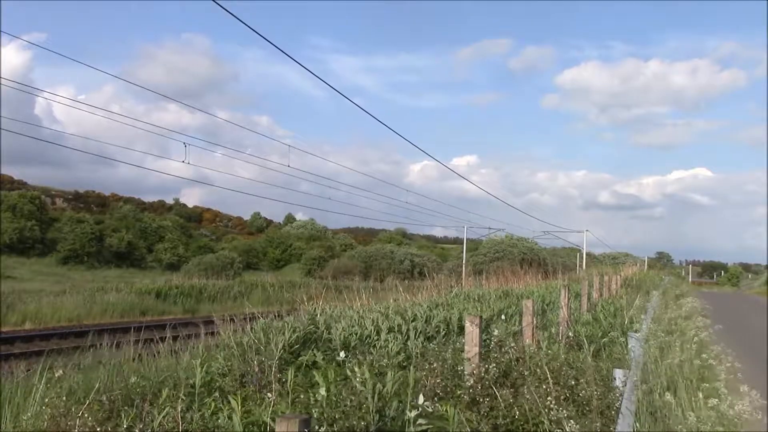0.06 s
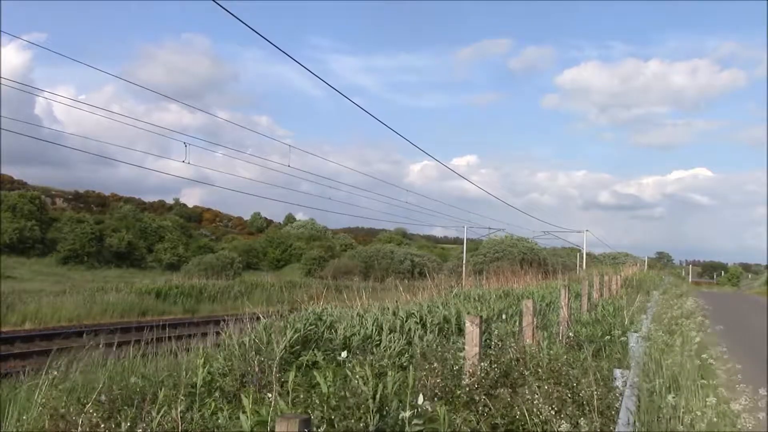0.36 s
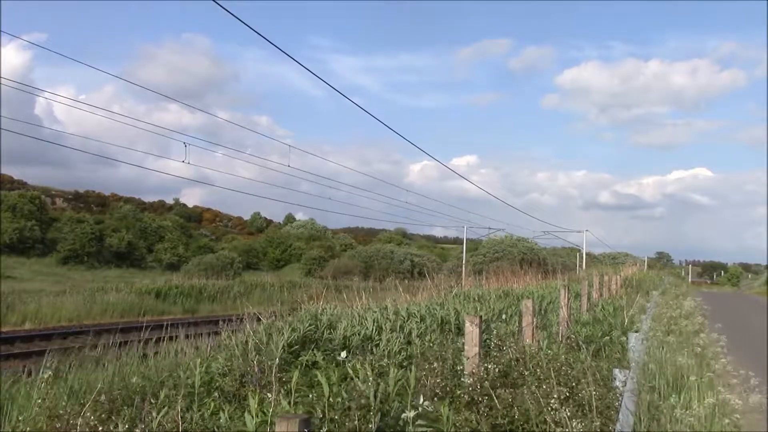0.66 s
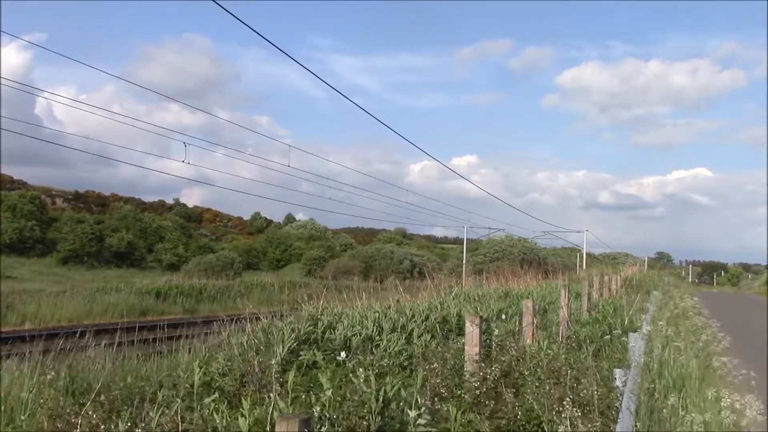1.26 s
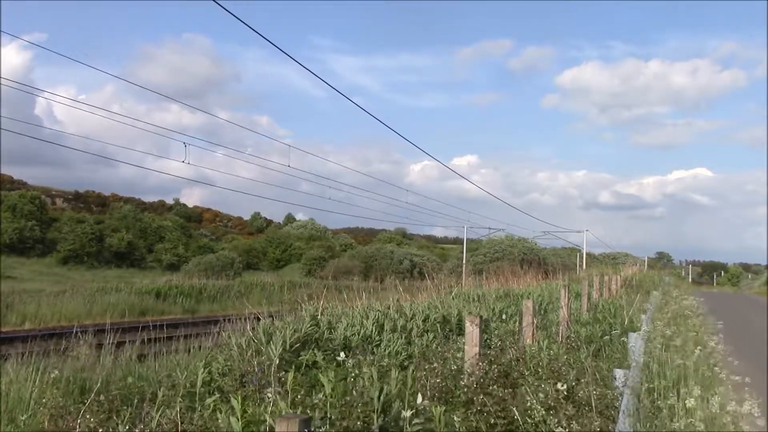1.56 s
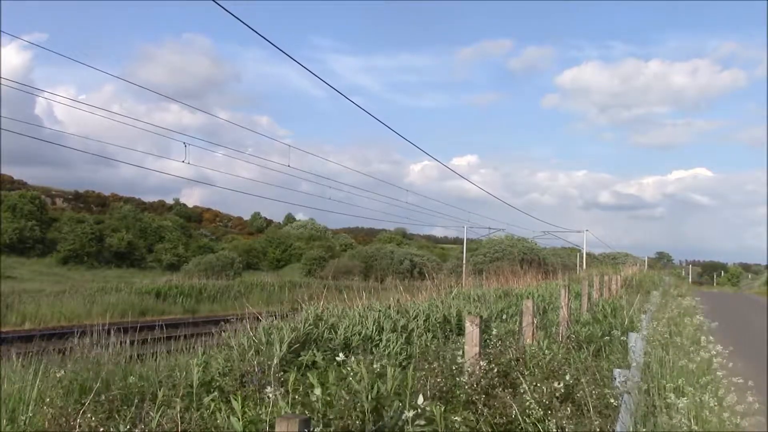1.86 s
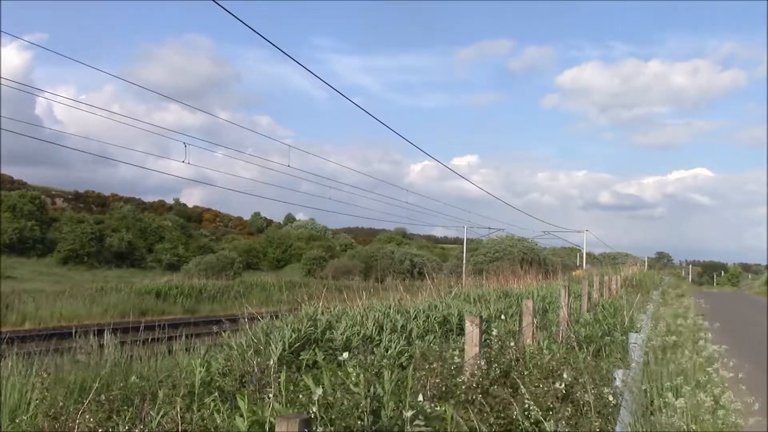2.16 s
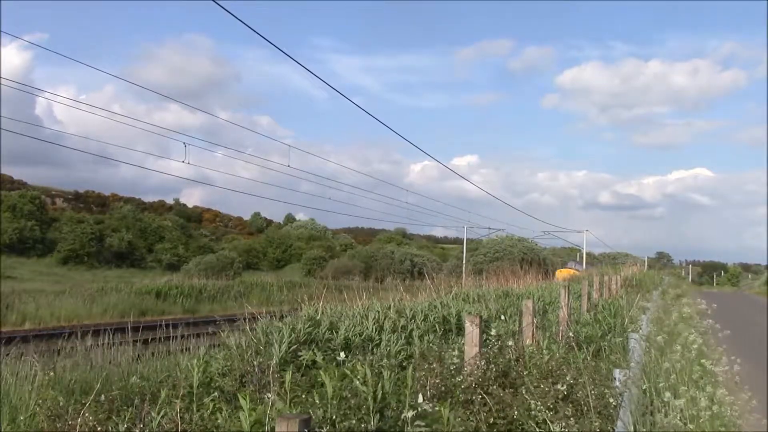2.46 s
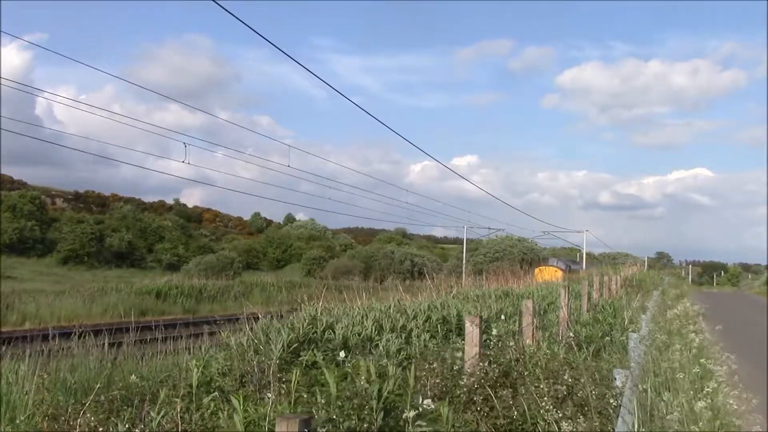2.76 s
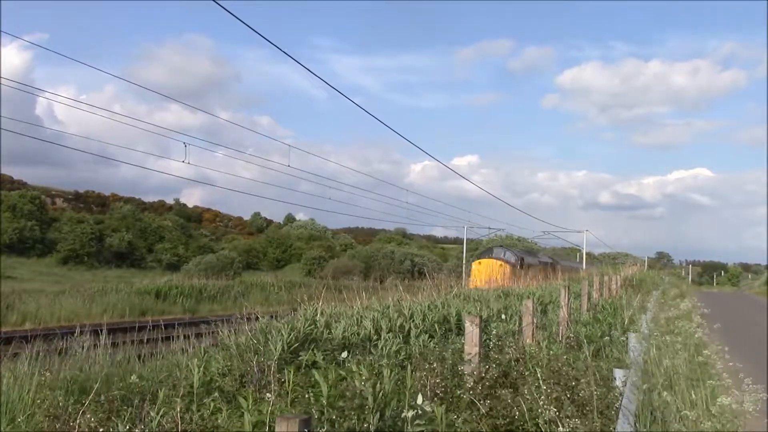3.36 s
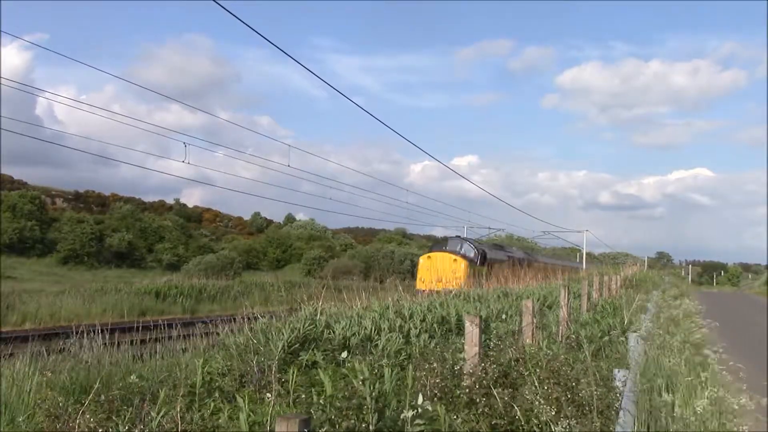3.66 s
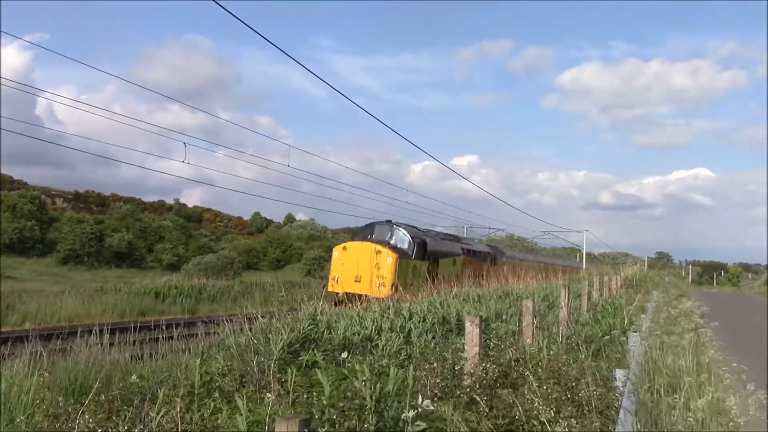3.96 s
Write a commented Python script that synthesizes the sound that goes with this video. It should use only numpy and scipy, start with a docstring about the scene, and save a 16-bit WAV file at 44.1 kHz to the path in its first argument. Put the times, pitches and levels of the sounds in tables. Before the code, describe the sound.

Rails chatter and hiss ahead of an oncoming diesel train, with gusts thumping the microphone.

```python
"""First you hear the rails sing: a chattering mid-range rush with a high steel hiss above it.
A diesel train is coming fast along open track, heard from the grass beside the line. Its rough wheels
shake the rails, which carry the sound ahead of it. The roar of the wheels and a low engine drone
grow as it nears, while gusts of wind thump and buffet the microphone."""
import sys
import numpy as np
from scipy import signal
from scipy.fft import rfft, irfft
from scipy.io import wavfile
from scipy.ndimage import uniform_filter1d, map_coordinates

SR = 44100
rng = np.random.default_rng(int(sys.argv[2]) if len(sys.argv) > 2 else 0)


def waveform_to_disk(signal):
    """Save audio, clipped to [-1, 1], as 16-bit WAV at the path in sys.argv[1]."""
    frames = np.transpose(np.atleast_2d(signal))
    scaled = np.clip(frames, -1, 1) * 32767
    samples = np.round(scaled).astype(np.int16)
    wavfile.write(sys.argv[1], SR, samples)


N = 176400
T = np.arange(N) / SR
HZ = np.maximum(np.arange(N // 2 + 1) * SR / N, 1)
TURN_HZ, TURN_HZ_PER_S = 10.277, .039  # how fast the wheels turn, and how fast that rises
TURNS = TURN_HZ * T + TURN_HZ_PER_S * T ** 2 / 2

# Rough spots on the wheels. Each row: place in the turn (0-1), strength in dB, half-length in seconds.
ROUGH_SPOTS = [(.03, 2, .002), (.15, 1, .0028), (.305, -1, .001), (.45, -3.5, .002), (.505, -3.5, .001),
               (.703, 3.5, .0017), (.875, -2, .0012)]
# Harder wheel knocks. Each row: time in seconds, dB above the rolling force.
WHEEL_KNOCKS = [(1.038, 28), (1.178, 26), (1.328, 24), (1.941, 26), (2.147, 28), (2.777, 25)]

# Pitches that ring easily. Each row: frequency in Hz, width in Hz, boost in dB.
TRACK_RESONANCES = [(409, 6, 5.5), (460, 13, 4), (483, 8, 2.5), (588, 10, 6), (631, 12, 5), (670, 14, 2.5),
                    (735, 14, 2), (770, 12, 2), (808, 10, 7.5), (886, 16, 4), (1083, 22, 3.5),
                    (1163, 20, 3.5), (1200, 16, 3), (1250, 22, 4.5), (1310, 22, 3), (1625, 50, 4.5),
                    (1800, 25, 2.5), (1861, 30, 4), (2031, 35, 3)]
HEAD_RESONANCES = [(4750, 220, 3), (5280, 100, 3), (5630, 170, 3.5), (6110, 110, 6), (6410, 90, 2.5),
                   (6880, 130, 2), (7270, 90, 2), (7482, 60, 3), (8300, 120, 2), (8830, 110, 3.5),
                   (9679, 120, 2), (9960, 90, 2), (10293, 130, 3), (10620, 110, 2), (10955, 110, 3),
                   (11230, 90, 2.5), (12350, 130, 2), (12920, 180, 2.5)]  # the head is the top of the rail

# The tone of each sound. Each row: frequency in Hz, relative level in dB.
BODY_TONE = [(290, -45), (350, -22), (400, -9.5), (482, -5.5), (500, -25), (516, -25), (530, -11),
             (565, -4.5), (612, -5), (700, -.5), (825, -.5), (850, -6), (880, -1.5), (950, -2),
             (1080, -15.5), (1300, -44)]  # the rail's lower bands, split by the spacing of the sleepers under it
RING_TONE = [(750, -42.5), (950, -11), (1060, -2), (1180, -.5), (1265, -2), (1330, -8), (1380, -13),
             (1425, -35), (1800, -52)]  # the rail ringing between its sleepers
HISS_TONE = [(1400, -42), (2100, -22), (2650, -15), (3300, -20), (4500, -30.5), (5200, -35), (5850, -26),
             (6150, -14), (6450, -17), (6850, -3), (7480, 1), (7750, -19), (8600, -35)]  # high waves in the rail head
SIZZLE_TONE = [(5500, -32), (7700, -13), (8400, -7.5), (9100, -5.5), (9900, -.5), (10600, 0), (11100, -1.5),
               (11700, -3.5), (13000, -5), (13700, -11.5), (15000, -15), (16000, -24)]  # the highest waves in the rail
NEAR_TONE = [(1500, -17), (2500, -18), (3500, -18.5), (5100, -16.5), (6100, -5.5), (6800, -1), (8200, -4),
             (9000, -5.5), (10200, -6), (11500, -13), (16000, -25)]  # broad hiss of wheels close by
ROAR_TONE = [(200, -20), (330, -8), (800, -3), (1330, -2.5), (1450, -8), (1600, 1), (2080, -1), (2800, -10),
             (4200, -15), (5100, -18), (6500, -21), (15000, -40)]  # wheel noise through the air
DRONE_NOTES = [(73, -19), (97, -2), (150, 2), (172, -6), (300, -5)]  # the separate notes of the engine
RUMBLE_TONE = [(20, -40), (45, -27), (70, -11), (100, -1), (150, 1), (240, -6), (350, -7), (700, -22)]  # the rumble under them
WIND_TONE = [(20, -30), (55, -21), (95, -6), (150, -2), (230, -1), (310, 3), (450, -1), (800, -17),
             (2000, -42)]  # wind on the microphone

# How the sounds swell and fade. Each row: time in seconds, relative level in dB.
BODY_SWELL = [(0, -37.5), (.2, -36.5), (.38, -32.5), (.62, -27.5), (.85, -30.5), (1.14, -26.5), (1.35, -28),
              (1.7, -26), (2.3, -22.5), (2.75, -20.5), (2.87, -19.5), (2.915, -15), (2.96, -19),
              (3.13, -19), (3.17, -25), (3.55, -25), (3.69, -25.5), (3.74, -21.5), (3.8, -25), (3.92, -25),
              (4, -21.5)]
RING_SWELL = [(0, -35), (.2, -34), (.44, -28), (.5, -24), (.56, -24.5), (.6, -17.5), (.7, -25.5),
              (.92, -26), (1.1, -22), (1.27, -25.7), (1.73, -25.2), (2.3, -20.5), (2.45, -21.5),
              (2.92, -20), (3.12, -20.3), (3.2, -26.5), (3.55, -29), (4, -28.5)]
HISS_SWELL = [(0, -38.5), (.16, -41), (.3, -35), (.4, -36), (.5, -30), (.62, -30), (.72, -32), (1.03, -30),
              (1.11, -27), (1.27, -30), (1.4, -32), (1.47, -27.5), (1.6, -30.5), (2.05, -30), (2.22, -35),
              (2.58, -29.5), (2.74, -32.5), (3, -28.5), (3.33, -38), (3.8, -32), (4, -35)]
SIZZLE_SWELL = [(0, -39.5), (.17, -39), (.42, -34), (.58, -27.5), (.76, -31.5), (.89, -28), (1.01, -32),
                (1.14, -27), (1.34, -31.5), (1.47, -28.5), (1.62, -30.5), (1.8, -28), (2.04, -29),
                (2.2, -33.5), (2.42, -30), (2.66, -29.5), (2.75, -33), (3.02, -29.5), (3.28, -34.5),
                (3.48, -31), (3.62, -33.5), (3.76, -34), (4, -37)]
NEAR_SWELL = [(0, -57), (2.25, -41.5), (2.45, -37), (2.52, -32), (2.62, -30.5), (2.75, -34.5),
              (2.89, -29.5), (3, -27), (3.08, -31), (3.34, -36.5), (3.47, -29.5), (3.63, -34.5),
              (3.69, -29), (3.81, -27.5), (3.89, -35), (3.96, -28.5), (4, -28.5)]
ROAR_SWELL = [(0, -48.5), (.15, -50), (.6, -38.5), (.75, -42.5), (1.1, -39.5), (1.3, -41), (2, -36.5),
              (2.97, -30), (3.12, -30.5), (3.25, -35.5), (3.5, -34), (3.75, -29.5), (4, -26.5)]
ENGINE_SWELL = [(0, -13), (.9, -14), (2, -6.5), (2.8, -1), (3.4, -5), (3.7, -7), (4, -4)]

# Single swirls of air hitting the microphone. Each row: middle in seconds, level in dB.
WIND_THUMPS = [(.043, -42), (.141, -38), (.204, -39), (1.012, -36), (1.43, -44), (1.59, -45), (2.654, -34),
               (2.775, -38), (2.822, -32), (2.943, -32), (2.985, -21.5), (3.025, -22.5), (3.087, -32),
               (3.135, -28), (3.285, -37), (3.452, -35), (3.818, -35)]
# Gusts. Each row: middle in seconds, half-length in seconds, level in dB, share of deep bass (0-1).
WIND_GUSTS = [(.09, .012, -48, .1), (.166, .022, -37, .1), (.41, .028, -48, .5), (.6, .05, -54, .5),
              (1.016, .012, -40, .4), (1.26, .016, -47, .6), (1.45, .025, -47, .6), (1.57, .025, -48, .7),
              (2.735, .012, -39, .5), (2.815, .014, -36, .6), (2.978, .018, -27, .6),
              (3.018, .009, -28, .8), (3.078, .014, -34, .8), (3.125, .012, -31, .7), (3.32, .02, -44, .5),
              (3.46, .025, -40, .5), (3.52, .015, -41, .5), (3.595, .012, -40, .6), (3.83, .04, -40, .4)]

# The microphone's two openings. Each row: frequency in Hz, how far the left one leads in radians.
LEFT_LEAD = [(4800, 0), (5700, 0.58), (7600, 0.5), (9000, 1.23), (10100, 1.42), (11900, 3.5), (13200, 3),
             (14200, 0)]
# Their balance. Each row: frequency in Hz, left level minus right level in dB.
LEFT_BALANCE = [(6000, 0), (6600, 2.6), (8600, -1.8), (9400, 1), (11300, -1.8), (12300, 2.2), (13500, -5),
                (15400, -1)]
# Scattered sound they pick up. Each row: frequency in Hz, share of the power (0-1).
SCATTERED_SHARE = [(4200, 0), (5500, .13), (7200, .05), (11000, .12), (13800, .33), (15200, .02)]


def undb(db):
    """Turn decibels into a number to multiply by."""
    return 10 ** (np.asarray(db) / 20)


def unit(x):
    """Scale a signal to an average (rms) level of 1."""
    return x / np.sqrt(np.mean(x ** 2))


def curve(rows):
    """Join (seconds, dB) points into a volume curve."""
    return undb(np.interp(T, *np.array(rows).T))


def across(rows):
    """Join (Hz, value) points into a value for every frequency."""
    hz, value = np.array(rows).T
    return np.interp(np.log(HZ), np.log(np.sort(hz)), value)


def colour(x, tone, boost_db=0):
    """Give a sound the tone of a table, at an average level of 1."""
    cepstrum = irfft(np.log(undb(across(tone) + boost_db)), N)
    # Folding this onto its first half makes the ringing follow each hit, never lead it.
    cepstrum[1:N // 2] *= 2
    cepstrum[N // 2 + 1:] = 0
    return unit(irfft(rfft(x) * np.exp(rfft(cepstrum)), N))


def resonances(rows):
    """A boost in dB that peaks at each ringing pitch."""
    return sum(db / (1 + (2 * (HZ - hz) / width) ** 2) for hz, width, db in rows)


def noise():
    """White noise."""
    return rng.standard_normal(N)


def wander(rate_hz):
    """A smooth random drift, about 1 in size."""
    return unit(irfft(rfft(noise()) * np.exp(-(HZ / rate_hz) ** 2), N))


def rough_spots(scatter_db=1.0, half_faded_s=2.8, fade_s=.4):
    """Rough spots hit the rail every turn, until their chatter sinks into the rush of many wheels."""
    bumps = 0
    for place, db, half_s in ROUGH_SPOTS:
        turns = TURNS - place + 1
        nearest = np.round(turns).astype(int)
        strength = undb(db + scatter_db * rng.standard_normal(size=64))[nearest]
        since_s = (turns - nearest) / TURN_HZ
        bumps += strength ** 2 * np.exp(-np.minimum((since_s / half_s) ** 2, 20))
    return bumps / (1 + np.exp((T - half_faded_s) / fade_s))


def wheel_force(bumps, repeat):
    """Ever-new rail roughness plus wheel roughness that repeats each turn, swelling at the bumps."""
    turn_samples = int(SR / TURN_HZ)
    tread = rng.standard_normal(turn_samples)[(TURNS % 1 * turn_samples).astype(int)]
    roughness = np.sqrt(repeat) * tread + np.sqrt(1 - repeat) * noise()
    power = 1 + abs(bumps)
    return roughness * np.sqrt(power / uniform_filter1d(power, turn_samples))


def rail_song(bumps, track_db, chatter=.55):
    """The wheels shake the rails, which carry some bands of pitch far ahead."""
    force = wheel_force(chatter * bumps, repeat=.28) + knocks()
    body = colour(force, BODY_TONE, track_db) * curve(BODY_SWELL) * undb(.3)
    ring = colour(force, RING_TONE, track_db) * curve(RING_SWELL) * undb(.8)
    return body + ring


def rail_ripple(spacing_hz=40):
    """The rail's many close resonances make random peaks and dips of about 1 dB."""
    heights = rng.standard_normal(size=1024)
    return np.interp(HZ / spacing_hz, np.arange(len(heights)), heights)


def shimmer(x, depth_db, rate_hz, band_hz=450):
    """Make each narrow band of a sound flicker on its own."""
    hz, times, frames = signal.stft(x, SR, nperseg=512)
    band, step = np.meshgrid(hz / band_hz, times * rate_hz, indexing="ij")
    flicker = map_coordinates(rng.standard_normal(size=(64, 256)), [band, step], mode="mirror")
    _, flickering = signal.istft(frames * undb(depth_db * flicker), SR)
    return unit(flickering[:N])


def rail_hiss(bumps, head_db, chatter=.12, flutter_db=.4):
    """The rail head hisses and sizzles; a broader hiss joins as the wheels come close."""
    force = wheel_force(chatter * bumps, repeat=.14)
    hiss = shimmer(colour(force, HISS_TONE, head_db), depth_db=1.2, rate_hz=22)
    hiss *= curve(HISS_SWELL)
    sizzle = shimmer(colour(force, SIZZLE_TONE, head_db), depth_db=1.5, rate_hz=12)
    sizzle *= curve(SIZZLE_SWELL) * undb(-.6)
    near = shimmer(colour(noise(), NEAR_TONE, head_db), depth_db=1.5, rate_hz=12)
    near *= curve(NEAR_SWELL) * undb(.9)
    return hiss + (sizzle + near) * undb(flutter_db * wander(25))


def wheel_roar(bumps, track_db, chatter=.3, flutter_db=.5):
    """The noise of the rolling wheels comes straight through the air."""
    force = wheel_force(chatter * bumps, repeat=.15)
    flutter = undb(flutter_db * wander(25))
    return colour(force, ROAR_TONE, track_db) * curve(ROAR_SWELL) * undb(-.1) * flutter


def engine(waver=.01, throb_db=2.0):
    """The diesel's wavering drone and rumble grow as the train nears."""
    wavering_time = np.cumsum(1 + waver * wander(8)) / SR
    drone = 0
    for hz, db in DRONE_NOTES:
        level = undb(db + throb_db * wander(10))
        drone += level * np.sin(2 * np.pi * (hz * wavering_time + rng.random()))
    rumble = colour(noise(), RUMBLE_TONE)
    return (unit(drone) * undb(-50) + rumble * undb(-44.5)) * curve(ENGINE_SWELL)


def wind_thumps(middle_hz=190, half_s=.0065, fall_octaves_per_s=78):
    """Each swirl of air gives a short, dull push that falls in pitch as it rolls past."""
    out = np.zeros(N)
    for (at, db), phase in zip(WIND_THUMPS, rng.random(len(WIND_THUMPS))):
        since_s = np.clip(T - at, -6 * half_s, 6 * half_s)
        cycles = np.cumsum(middle_hz * 2 ** (-fall_octaves_per_s * since_s)) / SR
        swell = undb(db) * np.exp(-(since_s / half_s) ** 2 / 2)
        out += swell * np.sin(2 * np.pi * (cycles + phase))
    return out


def wind_gusts(swirl_db=2.0, deep_below_hz=170):
    """Churning air buffets the microphone in short gusts, some deeper than others."""
    swirls = colour(noise() * undb(swirl_db * wander(60)), WIND_TONE)
    deep = irfft(rfft(swirls) / (1 + (HZ / deep_below_hz) ** 6), N)
    out = np.zeros(N)
    for at, half_s, db, bass in WIND_GUSTS:
        swell = undb(db) * np.exp(-((T - at) / half_s) ** 2 / 2)
        out += swell * (swirls - (1 - bass) * deep)
    return out


def knocks():
    """Single blows of a wheel on the rail stand out of the chatter."""
    force = np.zeros(N)
    for at, db in WHEEL_KNOCKS:
        force[int(at * SR)] = undb(db)
    return force


def microphone(direct, scattered):
    """Left and right hear the same bass and middle, but differ in the treble."""
    share = across(SCATTERED_SHARE)
    sides = np.array([[1], [-1]])  # left, right
    heard = np.sqrt(1 - share) * rfft(direct) + sides * np.sqrt(share) * rfft(scattered)
    balance = undb(sides * across(LEFT_BALANCE) / 2)
    phase_shift = np.exp(1j * sides * across(LEFT_LEAD) / 2)
    return irfft(heard * balance * phase_shift, N)


def scene():
    """Rails, train and wind meet at the microphone."""
    bumps = rough_spots()
    track_db = resonances(TRACK_RESONANCES)
    head_db = resonances(HEAD_RESONANCES) + rail_ripple()
    rails = rail_song(bumps, track_db) + rail_hiss(bumps, head_db)
    train = wheel_roar(bumps, track_db) + engine()
    wind = wind_gusts() + wind_thumps()
    return microphone(rails + train + wind, scattered=rail_hiss(bumps, head_db))


def record(dry, low_hz=55, top_hz=15750):
    """The recorder cuts the deepest bass and the highest treble."""
    bass_cut = signal.butter(2, low_hz, "high", fs=SR, output="sos")
    treble_cut = signal.ellip(10, .2, 80, top_hz, fs=SR, output="sos")
    return signal.sosfilt(treble_cut, signal.sosfilt(bass_cut, dry))


dry = scene()
out = record(dry)
waveform_to_disk(out)
```